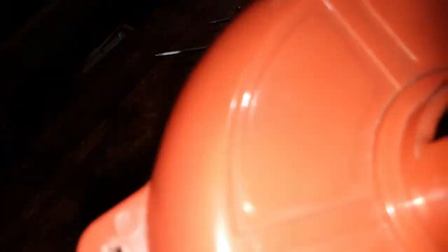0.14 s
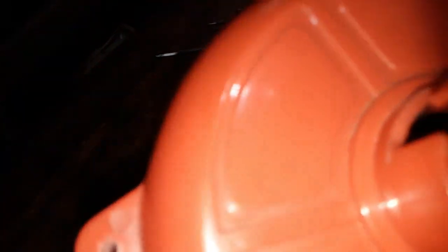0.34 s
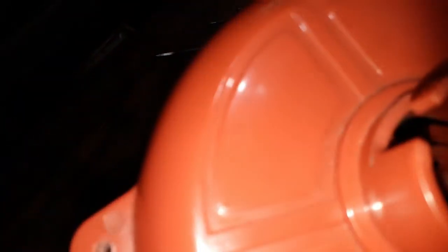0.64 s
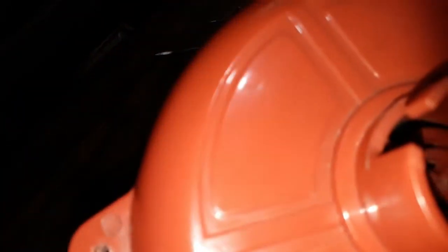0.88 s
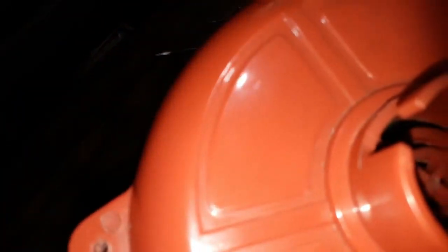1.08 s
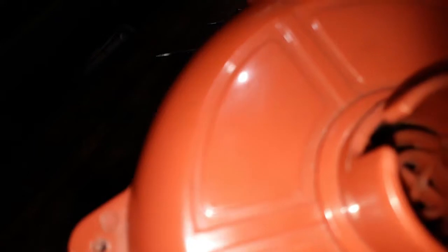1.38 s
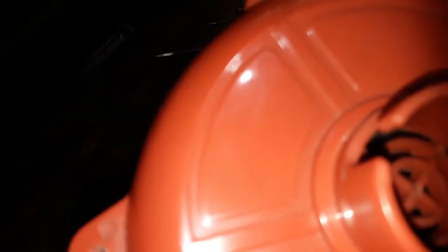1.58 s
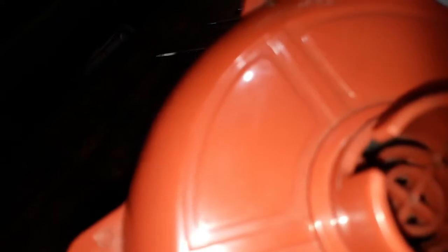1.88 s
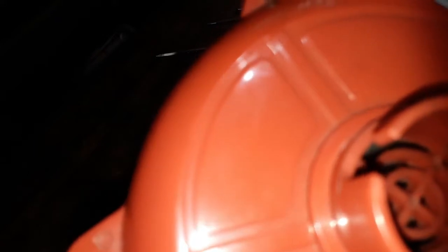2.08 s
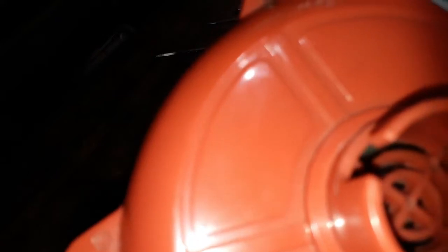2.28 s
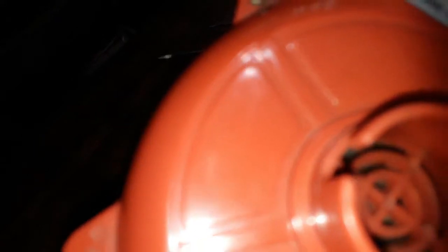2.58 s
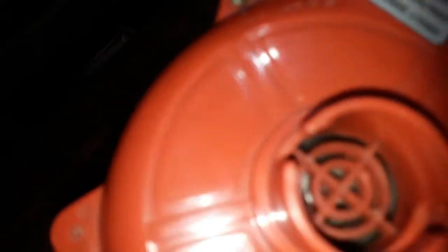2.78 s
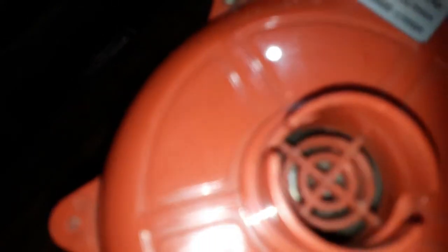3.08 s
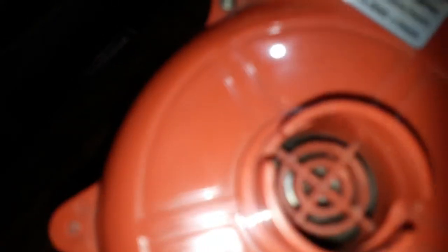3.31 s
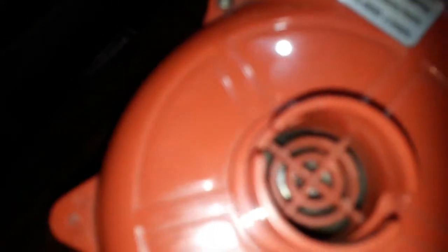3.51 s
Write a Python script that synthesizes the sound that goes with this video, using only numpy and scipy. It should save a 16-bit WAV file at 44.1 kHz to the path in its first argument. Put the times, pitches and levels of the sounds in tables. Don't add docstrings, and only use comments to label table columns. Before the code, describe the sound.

A small plastic-cased blower winds down close to the microphone in a quiet room: loud rattling buzz and falling whine slow into a softening flutter of knocks, then two small clicks and faint bench bumps.

```python
import sys
import numpy as np
from scipy import signal
from scipy.fft import rfft, irfft, next_fast_len
from scipy.io import wavfile
from scipy.ndimage import map_coordinates

SR = 44100
rng = np.random.default_rng(int(sys.argv[2]) if len(sys.argv) > 2 else 0)


def put_to_file(sound):
    columns = np.atleast_2d(sound).T
    safe = np.clip(columns, -1, 1)
    whole_steps = np.round(safe * 32767)
    wavfile.write(sys.argv[1], SR, whole_steps.astype(np.int16))


def gain_from_decibels(decibels):
    exponent = np.asarray(decibels, float) / 20
    return 10 ** exponent


N = 160965

# time_s, speed_turns_per_s
SHAFT_SPEED = [(0.0, 92.26), (0.2, 85.21), (0.4, 78.62), (0.6, 72.97), (0.8, 67.17), (1.0, 62.24),
               (1.25, 56.83), (1.5, 52.2), (1.75, 47.18), (2.0, 43.0), (2.25, 39.0), (2.5, 34.69),
               (2.8, 29.71), (3.1, 25.88), (3.4, 21.73), (3.65, 18.8)]
# time_s, knock_db, rub_db
EFFORT = [(0.0, -15.5, -28.5), (0.17, -15.5, -29), (0.42, -18, -30), (0.95, -20, -32), (1.21, -21, -33),
          (1.39, -20.5, -33.5), (1.75, -23.5, -36), (2.09, -22.5, -36.5), (2.4, -25, -38.5),
          (2.75, -29, -38.5), (3.03, -31.5, -42), (3.47, -46, -43.5), (3.65, -46, -44.5)]
# time_s, place_turns
CATCH_SPOT = [(0, .74), (1.31, .83), (2.03, 1.04), (2.56, 1.25), (3.65, 1.43)]
# time_s, change_db
ACCENTS = [
    (2.514, 2),
    (2.603, -2),
    (2.763, 6),
    (2.797, -7),
    (2.864, 2),
    (3.007, 3),
    (3.044, 2),
    (3.159, -6),
    (3.201, 9),
]
# pitch_hz, width_hz, level_db
HOUSING_LOW = [(172.2, 8.9, -11.5), (261.5, 10.2, -11.5), (339.9, 29.3, 4.5), (382.3, 39.7, 0),
               (661, 19.6, -4.5)]
# pitch_hz, width_hz, level_db
HOUSING_MIDDLE = [(449, 29.3, -5.5), (517.5, 42.7, -1), (851.6, 12.7, -6.5), (1238, 43.5, -2)]
# pitch_hz, width_hz, level_db
HOUSING_HIGH = [(1234, 26.7, -10), (1710, 205, 6), (2434, 206, 7.5), (2948, 333, 7), (4220, 230, -1),
                (4680, 100, -4.5), (4940, 155, -1.5), (5557, 270, 2), (7100, 440, -6.5), (8620, 670, -4),
                (11000, 760, -10.5)]
# pitch_hz, width_hz, level_db
BRUSH_PLATE = [(2350, 120, -3), (2540, 150, -.5), (2950, 210, 1), (3270, 200, -1), (3620, 200, -4),
               (3890, 160, .5), (4130, 210, -.5), (4800, 160, -4), (5350, 160, -4), (5650, 160, -5),
               (7200, 500, -5), (8150, 400, -5), (9600, 500, -6)]
# multiple_of_bar_rate, level_db
BAR_TONES = [(3, -8), (4, 0), (5, -4), (6, -10), (7, -12), (8, -12), (9, -15), (10, -13), (11, -15),
             (12, -13)]
# pitch_hz, width_hz, level_db
BLADE_RESONANCE = [(685, 60, -1)]
# pitch_hz, level_db_per_hz
AIR_COLOUR = [(520, -16), (880, -4), (1110, -8), (1250, -2.5), (1370, -5.5), (2920, -9), (3500, -7),
              (5720, -10.5), (15500, -28.5)]
# start_s, level_db, low_pitch_hz, high_pitch_hz, high_over_low_db
CLICKS = [
    (3.12, -23.5, 1510, 2340, -3),
    (3.485, -23.5, 1460, 2380, 3.5),
]
# start_s, level_db
BUMPS = [
    (3.417, -38),
    (3.47, -45),
    (3.533, -42),
    (3.593, -39),
]
# pitch_hz, level_db_per_hz
ROOM_COLOUR = [(59, -47), (100, -9), (177, 12), (394, 11.5), (1060, -9), (1620, -5.5), (2870, 1.5),
               (8770, -14), (15500, -29)]
# pitch_hz, level_db_per_hz
RUMBLE_COLOUR = [(8.8, -32), (15, 4), (19, -18), (27, -53), (38, -10), (130, -28), (170, -30), (290, -120)]

START_TURN, BARS, BLADES = 0.45, 12, 10
MIDDLE_SPEED = 50


def unit(x):
    return x / np.sqrt(np.mean(x ** 2) + 1e-20)


def curves(rows):
    s, *columns = np.transpose(rows)
    return [np.interp(np.arange(N) / SR, s, column) for column in columns]


def wobble(rate_hz):
    points = rng.standard_normal(int(N * rate_hz / SR) + 4)
    return map_coordinates(points, [np.arange(N) * rate_hz / SR])


def filtered(x, response):
    size = next_fast_len(N + SR // 2)
    return irfft(rfft(x, size) * response(np.fft.rfftfreq(size, 1 / SR)), size)[..., :N]


def body(peaks, turn=-1):
    def response(f):
        return sum(turn ** k * gain_from_decibels(db) * 1j * f * width / (hz * hz - f * f + 1j * f * width)
                   for k, (hz, width, db) in enumerate(peaks))
    return response


def coloured(points):
    f, db = np.transpose(points)

    def response(hz):
        return gain_from_decibels(np.interp(np.log(hz + 1), np.log(f), db, right=-120))
    return unit(filtered(rng.standard_normal(N), response))


def ring(start_s, hz, t60_s, attack_s):
    t = np.maximum(np.arange(N) / SR - start_s, 0)
    return np.sin(2 * np.pi * hz * t) * gain_from_decibels(-60 * t / t60_s) * (1 - np.exp(-t / attack_s))


def shaft_speed():
    return curves(SHAFT_SPEED)[0]


def speed_db():
    return 20 * np.log10(shaft_speed() / MIDDLE_SPEED)


def shaft_angle():
    return START_TURN + np.cumsum(shaft_speed()) / SR


def microphone_rumble():
    return gain_from_decibels(-76 + 0.41 * speed_db() + 2.2 * wobble(6.9)) * coloured(RUMBLE_COLOUR)


def room():
    return gain_from_decibels(-45) * coloured(ROOM_COLOUR)


def bench():
    sound = np.zeros(N)
    for start_s, db, low_hz, high_hz, high_db in CLICKS:
        low = ring(start_s, low_hz, 0.022, 0.0025)
        high = ring(start_s, high_hz, 0.022, 0.0012)
        sound += gain_from_decibels(db) * (low + gain_from_decibels(high_db) * high)
    for start_s, db in BUMPS:
        sound += gain_from_decibels(db) * ring(start_s, 176, 0.16, 0.0012)
    return sound


def moving_air(angle):
    twice = np.cos(4 * np.pi * (angle - curves(CATCH_SPOT)[0] - 0.0069 + 0.15 * wobble(0.82)))
    level_db = -4 + 0.93 * speed_db() + 1.5 * twice + 0.27 * wobble(210)
    return gain_from_decibels(level_db) * coloured(AIR_COLOUR)


def fan_blades(angle):
    return filtered(np.sin(2 * np.pi * BLADES * angle), body(BLADE_RESONANCE))


def bar_whine(angle):
    tones = np.zeros(N)
    for multiple, db in BAR_TONES:
        cycles = multiple * BARS * angle + rng.random() + 0.02 * wobble(30)
        tones += gain_from_decibels(db + wobble(4)) * np.sin(2 * np.pi * cycles)

    def plate(hz):
        low_cut = 1 / np.sqrt(1 + (2250 / (hz + 1)) ** 30)
        return body(BRUSH_PLATE, turn=1)(hz) ** 2 * low_cut
    return gain_from_decibels(-2.5) * filtered(tones, plate)


def brush_rub(angle):
    swing_db = 3 * np.cos(2 * np.pi * (angle - 0.83 + 0.32 * wobble(3.58)))
    grain_db = 1.8 * wobble(300)
    rub = gain_from_decibels(swing_db + grain_db) * rng.standard_normal(N)
    surface = rng.standard_normal((30, 512))
    wear = map_coordinates(surface, [angle / 9.5, angle % 1 * 512], order=1, mode="grid-wrap")
    worn = gain_from_decibels(swing_db) * np.gradient(wear) / shaft_speed()
    housing = body(HOUSING_HIGH)
    return gain_from_decibels(-1.5) * unit(filtered(rub, housing)) + gain_from_decibels(-7.5) * unit(filtered(worn, housing))


def grit_ticks(angle):
    place = angle + 0.015 * wobble(5) - curves(CATCH_SPOT)[0]
    chance = 1.5 * shaft_speed() / SR * (1 + np.cos(4 * np.pi * place)) ** 8
    grit = (rng.random(N) < chance) * rng.standard_normal(N)
    # pitch_hz, width_hz, level_db
    peaks = [(7050, 450, 12.5), (8550, 1000, 9.5), (10130, 1760, 9), (14900, 6100, 1.5)]
    return gain_from_decibels(-11 + 0.041 * speed_db()) * unit(filtered(grit, body(peaks)))


def brushes(angle, level_db):
    sound = brush_rub(angle) + moving_air(angle) + grit_ticks(angle) + bar_whine(angle) + fan_blades(angle)
    return gain_from_decibels(level_db + 0.11 * wobble(8.0)) * sound


def knock_pulses(angle):
    lead_s, jitter_s = 0.0025, 0.00012
    count = np.arange(1, int(angle[-1]) + 1)
    s = np.interp(count + 0.02, angle, np.arange(N) / SR) - 0.0019
    chance = rng.standard_normal((len(count), 4))
    limp = (-1.) ** count * np.clip((1.25 - s) / 0.2, 0, 1)
    blow_db = 1.1 * chance[:, 0] - 1.5 * limp
    for time_s, change_db in ACCENTS:
        blow_db[np.argmin(abs(s - lead_s - time_s))] += change_db
    blow_s = s + 0.0009 * limp + jitter_s * chance[:, 1]
    touch_s = blow_s - lead_s + jitter_s * chance[:, 3]
    touch_db = blow_db - 6 + 1.5 * chance[:, 2]
    at = np.clip(np.r_[touch_s, blow_s] * SR, 0, N - 1).astype(int)
    return np.bincount(at, gain_from_decibels(np.r_[touch_db, blow_db]), N) * np.sqrt(SR / shaft_speed())


def loose_rattle(angle):
    swell = gain_from_decibels(2.3 * np.cos(2 * np.pi * (angle - 0.95)))
    level_db = np.minimum(-10 + 1.4 * speed_db(), -3)
    return gain_from_decibels(level_db) * unit(swell * rng.standard_normal(N))


def knocks(angle, level_db):
    force = gain_from_decibels(level_db + 17) * (loose_rattle(angle) + knock_pulses(angle))
    force = filtered(force, lambda hz: 1 / (1 + 1j * hz / 616) ** 2)
    low = filtered(force, body(HOUSING_LOW, turn=0.96))
    middle = filtered(force * gain_from_decibels(0.69 * speed_db()), body(HOUSING_MIDDLE, turn=0.85))
    return low + middle


def scene():
    angle = shaft_angle()
    knock_db, rub_db = curves(EFFORT)
    mix = room() + bench() + brushes(angle, rub_db) + knocks(angle, knock_db)
    return mix[None]


def band_limit(x):
    return signal.sosfilt(signal.butter(12, 15680, fs=SR, output="sos"), x)


def record(dry):
    cut = filtered(dry, lambda hz: (1j * hz / (135 + 1j * hz)) ** 2)
    return band_limit(cut + microphone_rumble())


dry = scene()
out = record(dry)
put_to_file(out)
```